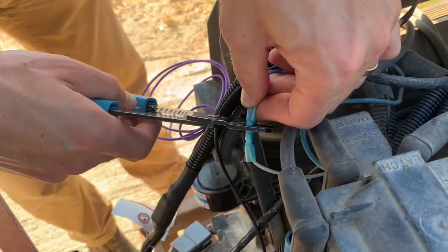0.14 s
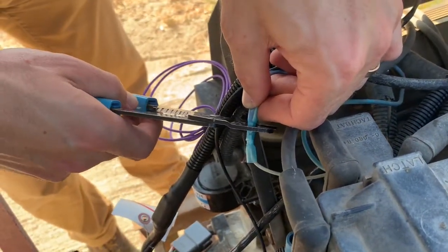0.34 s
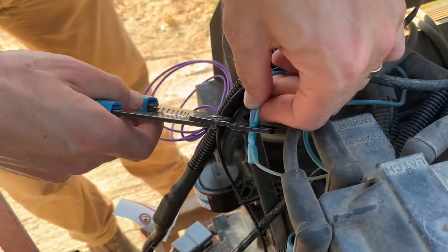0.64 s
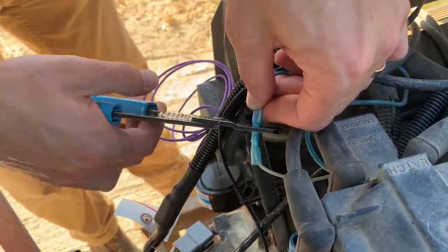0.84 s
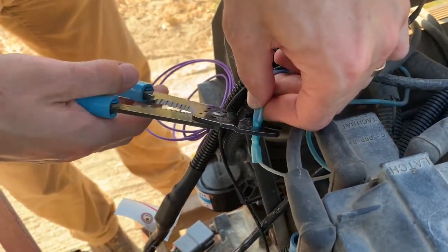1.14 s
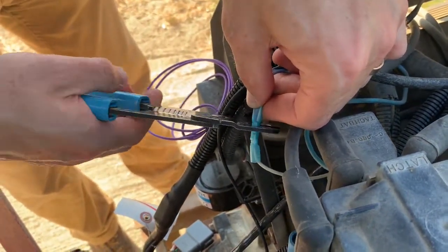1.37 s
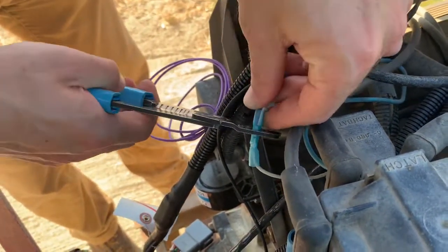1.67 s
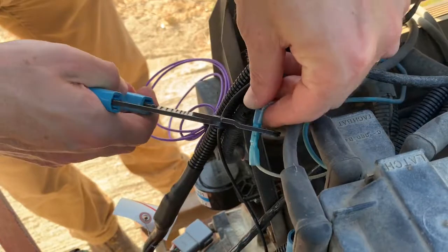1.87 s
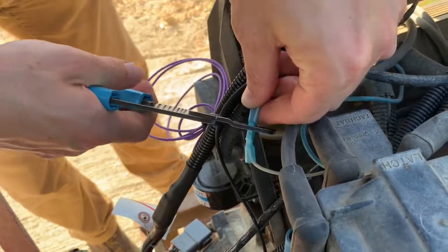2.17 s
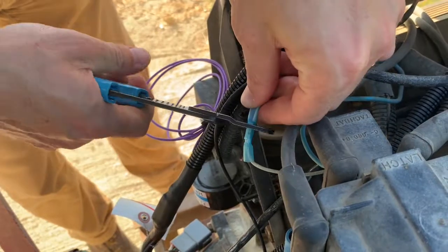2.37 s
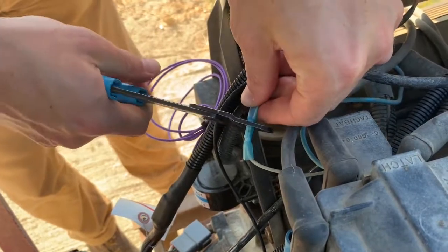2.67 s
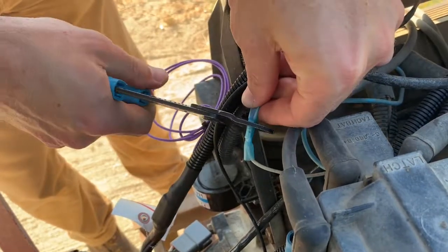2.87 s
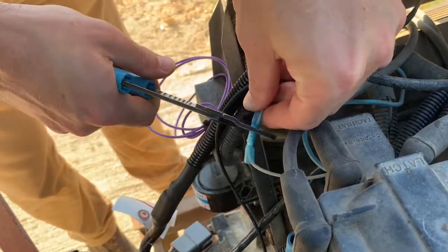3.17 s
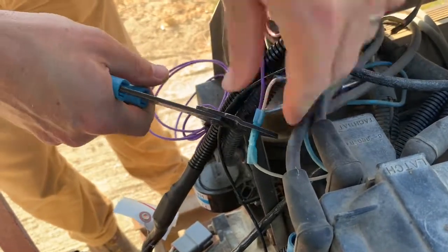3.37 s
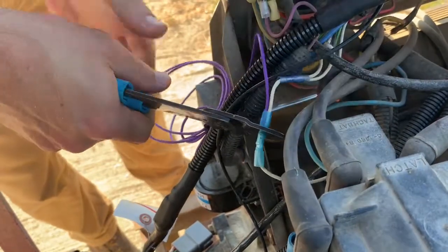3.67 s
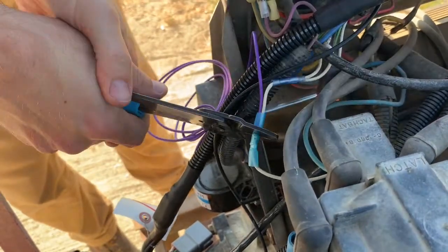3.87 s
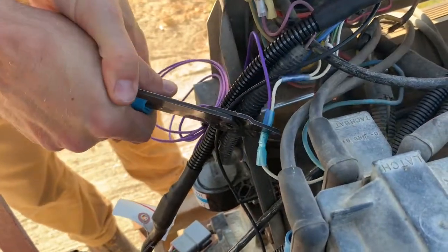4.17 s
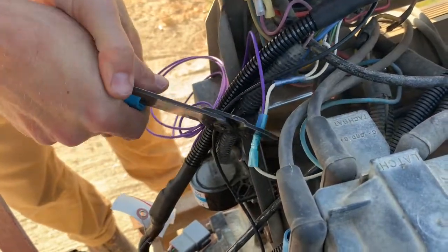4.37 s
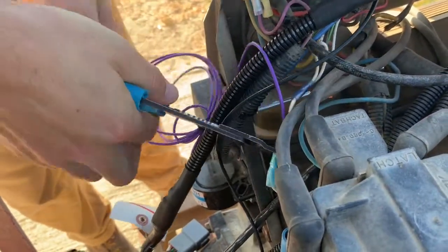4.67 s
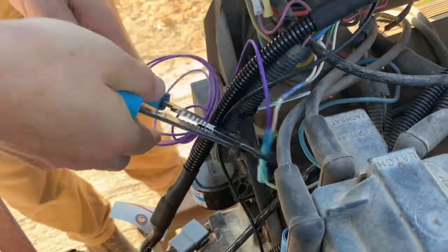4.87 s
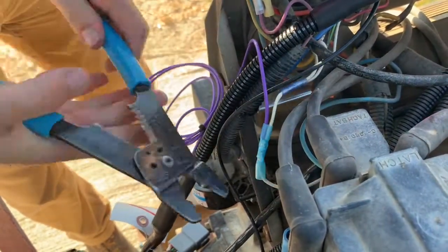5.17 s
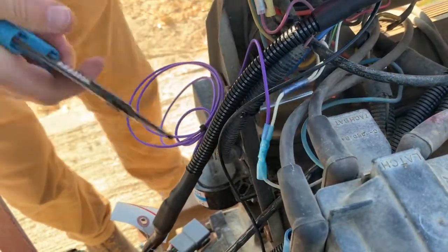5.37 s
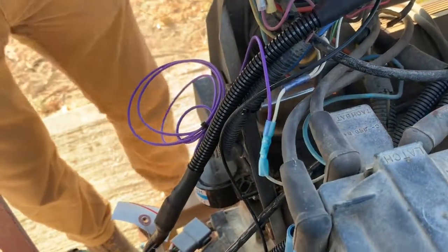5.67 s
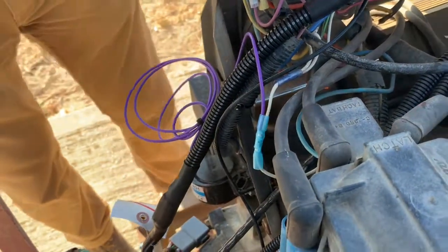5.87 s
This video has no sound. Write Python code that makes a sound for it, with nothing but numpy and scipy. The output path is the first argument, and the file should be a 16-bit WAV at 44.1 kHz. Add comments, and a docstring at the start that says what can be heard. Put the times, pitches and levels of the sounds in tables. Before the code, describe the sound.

Crimping pliers squeeze a wire connector with faint rustles, ticks and scrapes over a throbbing idling engine, ending in a sharp steel clack.

```python
"""Outdoors over an engine bay, hand crimping pliers are squeezed on a wire connector.
An idling engine, pulses ringing exhaust resonances, throbs against the rising harmonic drone of a distant one.
Air noise and two low hums lie beneath. Shaped noise and excited resonances make the hands and wires rustle,
scrape and knock, the pivot grate and the sleeve tick; low modes thud at the microphone.
Damped steel modes ring as the jaws clack together while the tool is taken away."""
import sys
import numpy as np
from scipy import signal
from scipy.fft import rfft, irfft, next_fast_len
from scipy.io import wavfile

SR = 44100
rng = np.random.default_rng(int(sys.argv[2]) if len(sys.argv) > 2 else 0)


def persist_wave(psi):
    """Save psi, clipped to +-1, as 16-bit WAV."""
    counts = np.round(np.clip(psi, -1, 1) * 32767).astype(np.int16)
    wavfile.write(sys.argv[1], SR, np.atleast_2d(counts).T)


N = 265923
SIDES = np.array([[1], [-1]])   # left, right


def from_db(db):
    """Logarithmic level: decibels to amplitude gain."""
    return 10 ** (np.asarray(db) / 20)


def rms_one(x):
    """Power normalisation: scale to unit mean square."""
    return x / np.sqrt(np.mean(x ** 2) + 1e-20)


def in_time(rows):
    """Linear interpolation: each column of a curve at every sample, held beyond its ends."""
    s, *columns = np.transpose(rows)
    return [np.interp(np.arange(N) / SR, s, column) for column in columns]


def at_hz(points, hz):
    """Interpolation on a logarithmic frequency axis."""
    table_hz, db = np.transpose(points)
    return np.interp(np.log(hz), np.log(table_hz), db)


def drift(rate_hz):
    """Low-passed noise: a slow random fluctuation of unit rms."""
    step = 40   # samples between the drawn points
    warm_up = 2000
    pole = np.exp(-2 * np.pi * rate_hz * step / SR)
    noise = rng.standard_normal(N // step + 2 + warm_up)
    slow = signal.lfilter([1], [1, -2 * pole, pole * pole], noise)[warm_up:]
    return np.interp(np.arange(N) / step, np.arange(len(slow)), rms_one(slow))


def band(x, low_hz, high_hz):
    """Causal band-pass filtering."""
    sos = signal.butter(2, [low_hz, high_hz], "band", fs=SR, output="sos")
    return signal.sosfilt(sos, x + 1e-18)


def ring(clicks, hz, t60):
    """Damped resonance: a unit click starts a decaying sine of height about 1."""
    pole = from_db(-60 / (t60 * SR))
    w = 2 * np.pi * hz / SR
    return signal.lfilter([0, np.sin(w)], [1, -2 * pole * np.cos(w), pole * pole], clicks + 1e-18)


def t60_of(width_hz):
    """Bandwidth and decay: a narrower resonance rings longer."""
    return np.log(1000) / np.pi / width_hz


def strikes(times, db):
    """Impulsive excitation: one click for each contact."""
    clicks = np.zeros(N)
    clicks[np.round(np.asarray(times) * SR).astype(int)] = from_db(db)
    return clicks


def bursts(times, db, t60, rise_s=0.00014):
    """Transient noise: stereo noise builds up briefly at each contact and decays exponentially."""
    fade, rise = from_db(-60 / (t60 * SR)), np.exp(-1 / (rise_s * SR))
    rise_and_fade = np.convolve([1, -fade], [1, -rise])
    envelope = signal.lfilter([1 - rise], rise_and_fade, strikes(times, db) + 1e-18)
    return envelope * rng.standard_normal((2, N))


def later(x, lag_ms):
    """Linear-phase delay: a fraction of a millisecond, keeping the treble."""
    size = next_fast_len(N + 512)
    per_ms = np.fft.rfftfreq(size, 1000 / SR)   # cycles per millisecond
    return irfft(rfft(x, size) * np.exp(-2j * np.pi * per_ms * lag_ms), size)[:N]


def place(x, pan_db, lag_ms):
    """Interaural cues: louder on the left by pan_db, and later there by lag_ms."""
    return np.array([later(x, lag_ms) * from_db(pan_db / 2), x * from_db(-pan_db / 2)])


def narrow_noise(hz, width):
    """Narrow-band noise: stereo, of the given relative width and unit rms."""
    return rms_one(band(rng.standard_normal((2, N)), hz / (1 + width), hz * (1 + width)))


# stereo breadth of broad noise: f/Hz, side-over-mid level/dB
NOISE_WIDTH = [(30,-13),(125,-12),(250,-23),(500,-8.5),(1000,0.5),(2500,-2),(6000,-3.5)]
# stereo balance of broad noise: f/Hz, left-over-right level/dB
NOISE_BALANCE = [(60,5),(200,5),(700,-6),(1300,-3),(4400,-3),(8000,0)]


def banded_noise(spectrum, patchy_db, left_lag_ms=0.453):
    """Spectral synthesis: half-octave bands of noise with their own flicker, width and balance; rms 1."""
    out = 0
    edges = 20 * 2 ** np.arange(0, 10.1, .5)
    white = rng.standard_normal((2, 2, N))   # mid and side sources, shared by alternate bands
    for k, (low, high) in enumerate(zip(edges, edges[1:])):
        hz = np.sqrt(low * high)
        if high > spectrum[0][0]:
            mid, side = band(white[k % 2], low, high)
            flicker_db = at_hz(spectrum, hz) + patchy_db * drift(15.3)
            gain = from_db(flicker_db + SIDES * at_hz(NOISE_BALANCE, hz) / 2)
            out = out + gain * (mid + from_db(at_hz(NOISE_WIDTH, hz)) * side * SIDES)
    return rms_one(np.array([later(out[0], left_lag_ms), out[1]]))


# outdoor background, relative spectral density: f/Hz, level/dB per Hz
AIR_SPECTRUM = [(20,2),(48,5.5),(88,1),(160,-3.5),(250,-12.5),(400,-21.5),(900,-23.5),(1600,-30),(2300,-24.5),(4000,-26),(6500,-27),(9000,-28),(13000,-25),(16000,-37)]


def open_air(level_db=-48.5):
    """Broadband ambience: random noise whose bands flicker independently."""
    return from_db(level_db) * banded_noise(AIR_SPECTRUM, patchy_db=3.0)


# two low hums about which pitch and level waver, one curve each: t/s, f/Hz, level/dB
HUM_CURVES = [
    [(0,62.5,-47.5),(2,62.5,-48),(4.3,65,-47),(5.1,60,-42),(6.03,62,-55)],
    [(2,72,-55.5),(3.3,73,-46),(6.03,76,-46.5)],
]


def hums(waver_db=2, wander=0.0183):
    """Slow frequency and amplitude modulation: two low sines waver under the engines."""
    out = 0
    for hz, db in map(in_time, HUM_CURVES):
        angle = 2 * np.pi * np.cumsum(hz * (1 + wander * drift(1.99))) / SR
        out = out + from_db(db + waver_db * drift(2.3)) * np.sqrt(2) * np.sin(angle)
    return place(out, pan_db=0.5, lag_ms=0.12)


# distant engine under load, firing rate: t/s, f/Hz
DRONE_PITCH = [(0.0, 100.356), (0.337, 101.109), (0.698, 103.127), (1.031, 105.521), (1.448, 104.037),
               (1.607, 109.128), (2.135, 106.316), (2.691, 107.009), (3.256, 110.305), (3.789, 112.433),
               (4.078, 111.879), (4.701, 113.945), (5.423, 115.776), (6.03, 119.586)]
# resonances that its partials slide through: f/Hz, relative level/dB
BUZZ_RESONANCES = [(298,-1),(320,-2.5),(350,-4.5),(400,-35),(435,-48),(458,-2.5),(505,-17.5),(540,-28),(608,-18.5),(632,-16),(645,-21.5),(660,-12.5),(750,-28.5),(848,-20),(875,-44),(950,-15.5),(985,-37),(1055,-15),(1080,-9),(1130,-24),(1165,-27),(1200,-37)]
# overall gain of its exhaust buzz: t/s, level/dB
BUZZ_LEVEL = [(0,-55.5),(1.5,-56),(1.85,-62),(2.42,-55),(2.7,-63.5),(4.6,-66.5),(5.3,-70)]
# partials above the fifth against the lower ones: t/s, relative level/dB
UPPER_BUZZ = [(0.4,-2),(0.9,1.5),(1.4,2.5),(1.9,5),(2.15,-2.5),(2.45,0.5)]


def distant_engine(drone_db=-43.5, flutter_db=2.5, rough=0.16):
    """Harmonic series: a clean fundamental climbs in pitch while rough upper partials fade away."""
    hz, = in_time(DRONE_PITCH)
    angle = 2 * np.pi * np.cumsum(hz) / SR
    upper_db, = in_time(UPPER_BUZZ)
    level_db, = in_time(BUZZ_LEVEL)
    buzz = 0
    for k in range(3, 12):
        steadiness = 1 if k > 3 else .5   # the third partial flutters half as much
        db = at_hz(BUZZ_RESONANCES, k * hz) + upper_db * (k > 5) + flutter_db * drift(3.9) * steadiness
        buzz = buzz + from_db(db) * (1 + rough * drift(27)) * np.sin(k * angle)
    drone = place(-from_db(drone_db) * np.sin(angle), pan_db=2.0, lag_ms=0.3)
    return np.sqrt(2) * (drone + place(from_db(level_db) * buzz, pan_db=-1.0, lag_ms=0.36))


# the idle sags under load and recovers, firing rate: t/s, f/Hz
IDLE_RATE = [(0.0, 22.022), (0.475, 22.042), (0.985, 21.529), (1.415, 21.434), (1.757, 21.715),
             (1.875, 20.41), (2.283, 20.117), (2.738, 19.433), (3.343, 19.951), (3.572, 19.3),
             (3.933, 19.888), (4.218, 19.389), (4.47, 20.735), (4.71, 20.353), (4.831, 21.212),
             (5.363, 22.576), (5.681, 21.705), (6.03, 22.006)]
# exhaust resonances: f/Hz, width/Hz, relative level/dB
EXHAUST_MODES = [(55.0, 18.5, -13.7), (106.0, 39.4, 7.4), (112.0, 29.6, 9.2), (150.0, 72.7, -0.3),
                 (157.6, 12.8, -18.0)]
# loudness of the idle: t/s, level/dB
IDLE_LEVEL = [(0.0, -39.5), (1.38, -38.5), (1.53, -36.5), (1.77, -39.5), (1.95, -39.48), (3.0, -37),
              (4.6, -37), (5.3, -36.5), (6.03, -37.5)]


def idling_engine(uneven_db=0.95, low_hz=58.0, top_hz=160, first_firing_s=0.0238):
    """Pulse-excited resonance: one puff per firing booms in the exhaust as the speed hunts."""
    rate, = in_time(IDLE_RATE)
    level_db, = in_time(IDLE_LEVEL)
    firings = np.cumsum(rate) / SR - first_firing_s * rate[0]
    puffs = np.diff(np.floor(firings), prepend=-1) * from_db(uneven_db * drift(9.8))
    boom = 0
    for k, (hz, width_hz, db) in enumerate(EXHAUST_MODES):
        boom = boom + (-1) ** k * from_db(db) * ring(puffs, hz, t60_of(width_hz))
    return place(from_db(level_db) * rms_one(band(boom, low_hz, top_hz)), pan_db=2.0, lag_ms=0.05)


def stroke(start, length, attack_s=0.052, release_s=0.072):
    """Envelope of motion: a movement of the hand builds up, holds and decays."""
    t = np.arange(N) / SR - start
    return np.clip(t / attack_s, 0, 1) * np.exp(-np.clip((t - length) / release_s, 0, 20))


def grating(modes, slips_per_s, spread_db, patchy_db):
    """Stick-slip friction: random uneven slips ring resonances that come and go; stereo, rms 1."""
    out = 0
    for hz, width_hz, db in modes:
        sizes = from_db(spread_db * np.minimum(rng.exponential(1, N), 4))
        slips = (rng.random(N) < slips_per_s / SR) * sizes
        tone = ring(slips * rng.standard_normal((2, N)), hz, t60_of(width_hz))
        out = out + from_db(db + patchy_db * drift(4.0)) * rms_one(tone)
    return rms_one(out)


# steady rustle of the hands working the tool: t/s, relative level/dB
RUSTLE = [(.4,-61),(1.25,-57),(1.6,-53),(2.0,-53.5),(2.7,-56),(3.3,-54),(3.66,-56.5),(3.9,-53),(4.4,-53),(5.1,-54.5),(5.3,-58.5)]
# separate squeezes and shifts of the grip: start t/s, length/s, rubbing and sliding relative level/dB
GRIP_STROKES = [(0.151,0.089,-54.5,-50.5),(0.434,0.65,-60.5,-51),(2.203,0.566,-83,-56.5),(5.416,.09,-60,-76)]
# colour of rubbing, then of sliding, relative density: f/Hz, level/dB per Hz
RUB_SPECTRUM = [(300,-36),(700,-8),(1100,-2.5),(1600,-3),(2300,2.5),(4000,4),(6000,-5),(12000,-27)]
SLIDE_SPECTRUM = [(3000,-12),(5500,-2),(6700,10),(8500,6),(10500,-3.5),(13000,3),(16000,7)]
# resonances of the rubbed wires and grips: f/Hz, width/Hz, relative level/dB
RUBBED_MODES = [(2193,110,-2.5),(2490,180,-6),(3240,73,-4),(3700,170,-3.5),(3980,340,-0.5),(4550,92,-11),(5080,160,-5.5)]


def hands(grain_db=0.78, wire_db=-6, rub_db=-6, slide_db=-0.5, rustle_slide_db=1.5):
    """Friction noise: skin, wire and plastic grips rub in tiny uneven slips."""
    rustle = from_db(in_time(RUSTLE)[0])
    rub, slide = rustle, rustle * from_db(rustle_slide_db)
    for start, length, stroke_rub_db, stroke_slide_db in GRIP_STROKES:
        shape = stroke(start, length)
        rub = np.hypot(rub, from_db(stroke_rub_db) * shape)   # powers add
        slide = np.hypot(slide, from_db(stroke_slide_db) * shape)
    wires = from_db(wire_db) * grating(RUBBED_MODES, slips_per_s=320, spread_db=2.0, patchy_db=3)
    rubbing = rub * (wires + from_db(rub_db) * banded_noise(RUB_SPECTRUM, patchy_db=2.5))
    sliding = slide * from_db(slide_db) * banded_noise(SLIDE_SPECTRUM, patchy_db=1.0)
    return from_db(grain_db * drift(110)) * (rubbing + sliding)


# wires and tool scrape with a faint pitch: middle t/s, length/s, f/Hz, level/dB, relative width
SCRAPE_EVENTS = [(0.204,0.072,3880,-61,0.046),(0.23,0.18,2340,-68,0.099),(0.33,0.063,3240,-64,0.03),(0.412,0.06,3370,-64,0.03),(0.68,0.064,6850,-55,.05),(0.827,0.11,7900,-55.5,0.1),(1.04,0.11,6500,-63,.015),(1.634,0.052,1270,-59,.12),(1.68,0.31,2540,-60.5,0.09),(3.35,0.076,2410,-63,0.073),(3.457,0.22,4240,-62,0.04),(3.78,0.34,325,-61.5,0.26),(3.81,0.022,318,-51,0.12),(3.868,0.13,2960,-56,0.28),(4.144,0.13,2210,-63,0.035),(4.306,0.098,3980,-65,0.034),(4.79,0.39,328,-63,0.23)]


def scrapes(grain_db=1.0):
    """Resonant friction: short sliding contacts swell and fade, each in one noise band."""
    t = np.arange(N) / SR
    sound = 0
    for middle, length, hz, db, width in SCRAPE_EVENTS:
        swell = np.exp(-2 * np.minimum(((t - middle) / length) ** 2, 20))
        sound = sound + from_db(db) * swell * narrow_noise(hz, width)
    return sound * from_db(grain_db * drift(65))


# tool and wires knock lightly: t/s, click relative level/dB, ring f/Hz, ring level/dB, relative width, t60/s
KNOCK_EVENTS = [(1.573,-48,1200,-50.5,1,0.091),(3.2693,-41.5,4500,-47,.06,0.04),(3.414,-51,1080,-52.5,0.25,.05),(3.808,-51,1100,-43.5,0.18,0.034),(3.94,-51,3220,-49.5,0.045,.06),(4.184,-43,1590,-53,0.58,.04),(4.36,-58,3090,-48.5,0.027,0.054),(4.623,-36,2440,-42,0.74,0.035),(4.648,-40,3930,-45,0.11,0.028),(4.912,-48,3500,-46,0.13,.03),(4.941,-42,1730,-47.5,0.094,0.094),(5.0567,-48,3270,-41,0.4,0.014),(5.0583,-55,3450,-40,0.035,0.023),(5.1012,-32,5300,-45,0.055,.014),(5.1045,-61,1900,-45.5,0.65,0.019),(5.189,-50,1800,-51,0.61,0.031),(5.941,-46,960,-54,.5,0.046)]


def knocks(click_db=3, click_t60=0.0098):
    """Impact and decay: the tool touches the wiring with a click, then the touched part rings."""
    t = np.arange(N) / SR
    times, clicks_db = np.transpose(KNOCK_EVENTS)[:2]
    out = band(bursts(times, clicks_db + click_db, click_t60), 560, 14400)
    for s, _, hz, db, width, t60 in KNOCK_EVENTS:
        decay_db = -60 * np.clip((t - s) / t60, 0, 2)
        out += (t >= s) * from_db(db + decay_db) * narrow_noise(hz, width)
    return out


# dull bumps against the microphone: t/s, relative level/dB, contact low-pass f/Hz
BUMP_CONTACTS = [(2.427, -31, 220), (2.4369, -22.5, 520), (2.466, -21.5, 140), (2.5126, -28, 300),
                 (2.539, -23, 120)]
# what they ring with: f/Hz, relative level/dB, t60/s
THUD_MODES = [(42, -6, 0.092), (59, -5, 0.078), (120, 1, 0.061), (181, -2, 0.029), (320, -16, 0.02)]


def bumps():
    """Soft impact: a rounded push has little treble and excites low modes as a thud."""
    pushes = 0
    for s, db, dull_hz in BUMP_CONTACTS:
        rounding = signal.butter(3, dull_hz, fs=SR, output="sos")
        pushes = pushes + signal.sosfilt(rounding, strikes([s], db) + 1e-18)
    thud = sum(from_db(db) * ring(pushes, hz, t60) for hz, db, t60 in THUD_MODES)
    return place(-band(band(thud, 30, 400), 16, 410), pan_db=0.5, lag_ms=0.071)


# the jaws grate at their pivot as they are first worked: start t/s, length/s, level/dB
PIVOT_STROKE = (0.584, 0.505, -57)
# what the grating rings with: f/Hz, width/Hz, relative level/dB
GRATING_MODES = [(5780,130,0),(6530,130,4),(6700,220,1),(7250,220,-1),(7960,300,1),(9020,200,-1)]


def pivot():
    """Stick-slip friction: steel grates on steel as the jaws turn."""
    start, length, db = PIVOT_STROKE
    grate = grating(GRATING_MODES, slips_per_s=400, spread_db=4.0, patchy_db=1.5)
    return from_db(db) * stroke(start, length) * grate


# between the snaps the sleeve crackles faintly: from t/s, to t/s
CRACKLE_TIME = (2.26, 2.56)


def crackle(count, snap_db=-40, spread_db=3, lower_db=-13):
    """Random point process: faint snaps in the hardest squeeze, in rows like those of SLEEVE_SNAPS."""
    start, end = CRACKLE_TIME
    rows = []
    for when, size in rng.random((count, 2)):
        rows.append((start + (end - start) * when, snap_db + spread_db * (2 * size - 1), lower_db))
    return rows


# the plastic sleeve snaps under the jaws: t/s, relative level/dB, lower band against that level/dB
SLEEVE_SNAPS = [(0.644,-46,11),(0.8384,-47,14.5),(0.904,-47,11),(2.209,-38.5,-17),(2.3593,-33,-18),(2.429,-43.5,3),(2.4968,-37.5,0.5),(2.677,-38,1),(2.7361,-37,0.5),(4.611,-40,-1),(5.031,-40,-15),(5.182,-46,-14)]


def sleeve_ticks(top_db=7, lower_gain_db=2, t60=0.013):
    """Sudden release of strain: the squeezed sleeve gives way in tiny bright snaps."""
    s, db, lower_db = np.transpose([*SLEEVE_SNAPS, *crackle(count=8)])
    upper = band(bursts(s, db + top_db, t60), 11500, 20727)
    return upper + band(bursts(s, db + lower_db + lower_gain_db, t60), 4800, 8500)


def struck(contacts, hz, mode_db, t60):
    """Contact spectrum: a dull contact hardly reaches the high modes."""
    s, db, dull_hz = np.transpose(contacts)
    dulling_db = 10 * np.log10(1 + (hz / dull_hz) ** 2)
    return ring(strikes(s, db + mode_db - dulling_db), hz, t60)


# the jaws clack shut and bounce: t/s, relative level/dB, contact dullness f/Hz
JAW_CONTACTS = [(5.34773, -8.2, 43100.0), (5.34833, 5.0, 3500.0), (5.35031, -17.7, 19000.0),
                (5.35301, -6.5, 9100.0)]
# steel modes of the pliers, damped by the hand: f/Hz, relative level/dB, t60/s
STEEL_MODES = [(447,-22.5,0.015),(770,-16,0.026),(930,-16,0.05),(1380,-18,0.015),(1700,-24.5,0.018),(2253,-10,0.033),(2540,2.5,0.0032),(2770,-2,0.012),(3400,-24,0.022),(4555,-6.5,0.014),(4690,-11,0.02),(4870,-12,0.033),(5280,-0.5,0.028),(5440,-13,0.034),(5940,-15,0.029),(6680,-1,0.022),(7100,-7,0.034),(7504,12.4,0.0024),(7700,-2,0.018),(8250,-3.5,0.016),(8780,-3.5,0.026),(9300,4.5,0.0043),(9800,-16,0.026),(12479,-9,0.018),(13900,8,0.005)]
# uneven radiation of the modes: f/Hz, left-over-right level/dB
JAW_RADIATION = [(900, -6), (2200, 5), (2800, 0), (5200, 5), (7000, 3), (8300, 2.5)]


def jaws(steel_db=-21.5, crack_db=-27, crack_t60=0.0091):
    """Modal synthesis: a crack and bounces ring the pliers, whose modes radiate unevenly to the two sides."""
    s, db, _ = np.transpose(JAW_CONTACTS)
    out = from_db(crack_db) * band(bursts(s, db, crack_t60, rise_s=.0001), 1350, 20727)
    for k, (hz, mode_db, t60) in enumerate(STEEL_MODES):
        gains = from_db(SIDES * at_hz(JAW_RADIATION, hz) / 2)
        out += (-1) ** k * gains * struck(JAW_CONTACTS, hz, steel_db + mode_db, t60)
    return np.array([out[0], later(out[1], lag_ms=0.03)])


def scene():
    """Superposition: engines and open air lie behind the close work of the hands."""
    background = open_air() + hums() + distant_engine() + idling_engine()
    handling = hands() + scrapes() + knocks() + bumps()
    return background + handling + pivot() + sleeve_ticks() + jaws()


def record(dry, crossover_hz=7600, top_hz=14700, cutoff_hz=15750, apart_db=-10, right_lag_ms=.237):
    """Interchannel coherence: the highest treble is nearly shared, later on the right; the top rolls off."""
    low, high = (signal.butter(6, crossover_hz, kind, fs=SR, output="sos") for kind in ("low", "high"))
    left, right = signal.sosfilt(high, signal.sosfilt(high, dry))
    own = from_db(apart_db)
    right = later((left + own * right) / np.hypot(1, own), right_lag_ms)
    sound = signal.sosfilt(low, signal.sosfilt(low, dry)) + np.array([left, right])
    sound = signal.sosfilt(signal.butter(10, top_hz, fs=SR, output="sos"), sound)
    return signal.sosfilt(signal.ellip(10, .1, 80, cutoff_hz, fs=SR, output="sos"), sound)


dry = scene()
out = record(dry)
persist_wave(out)
```